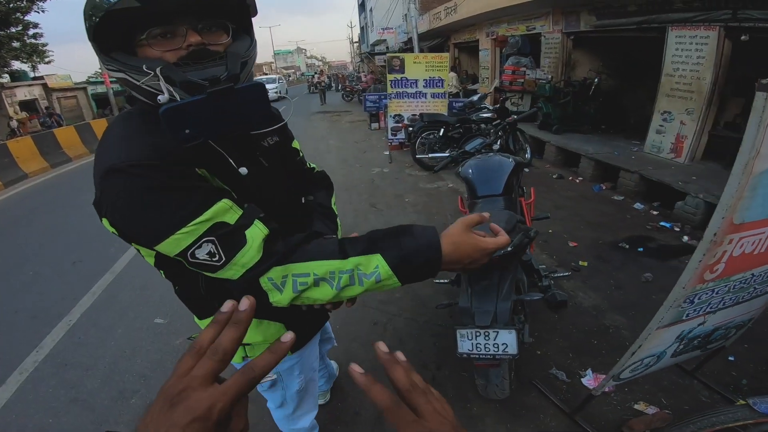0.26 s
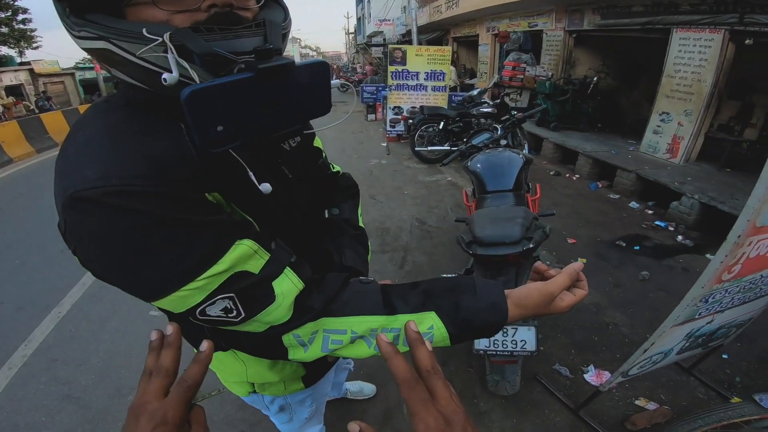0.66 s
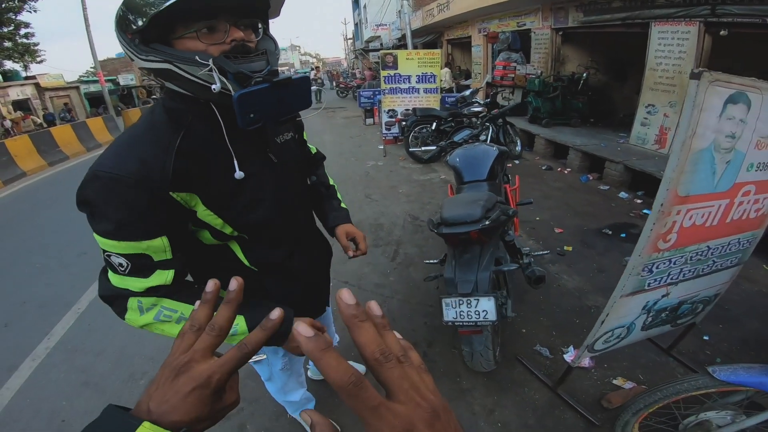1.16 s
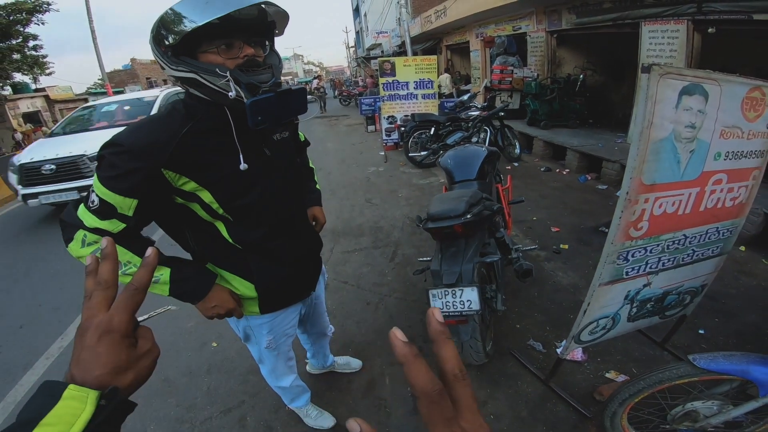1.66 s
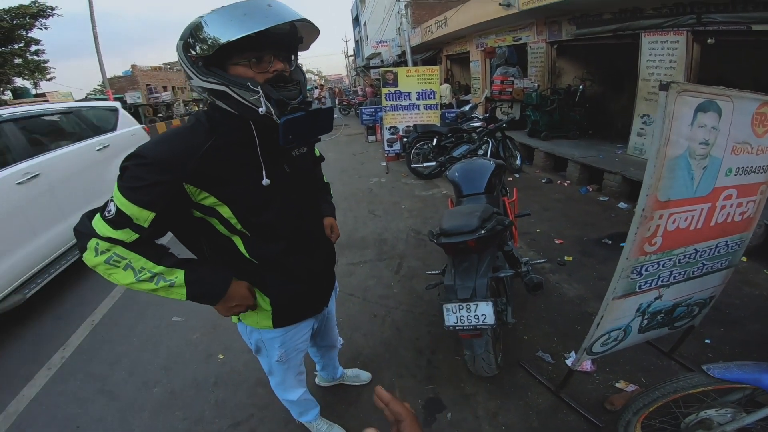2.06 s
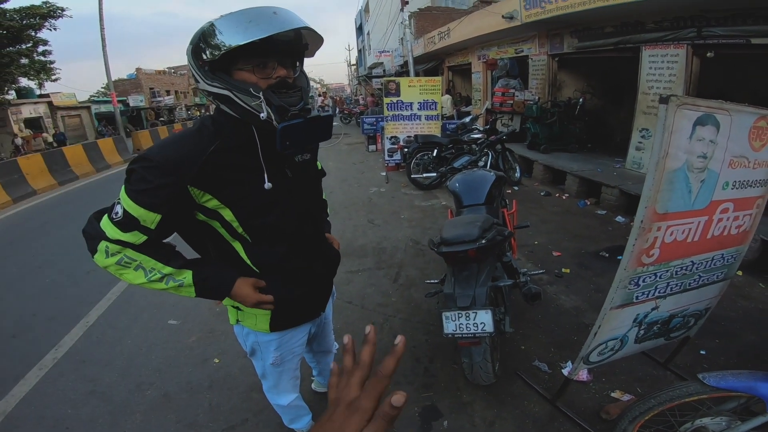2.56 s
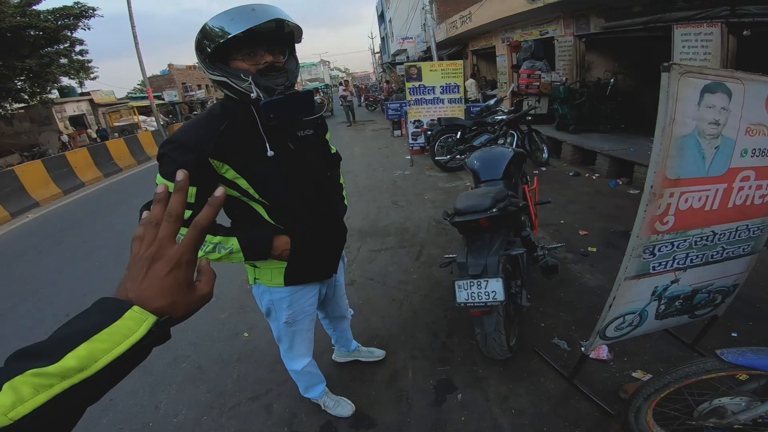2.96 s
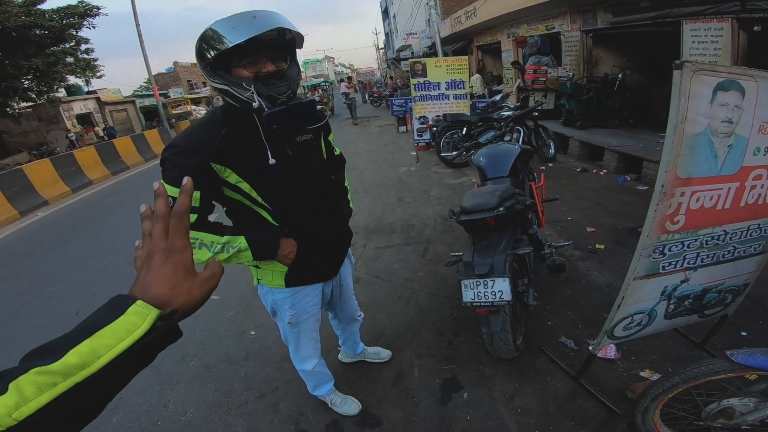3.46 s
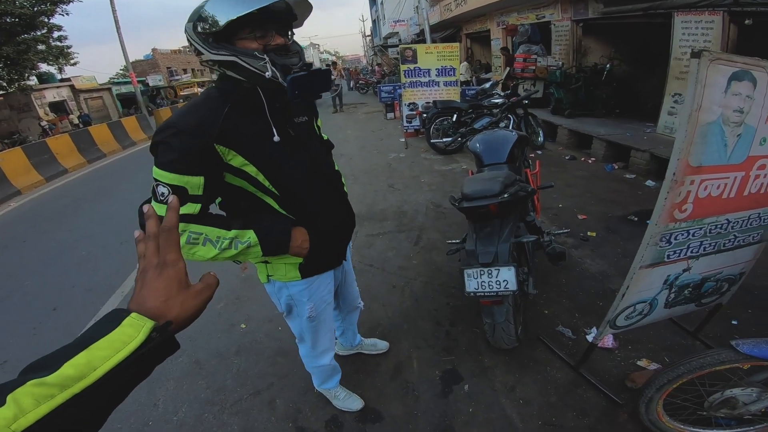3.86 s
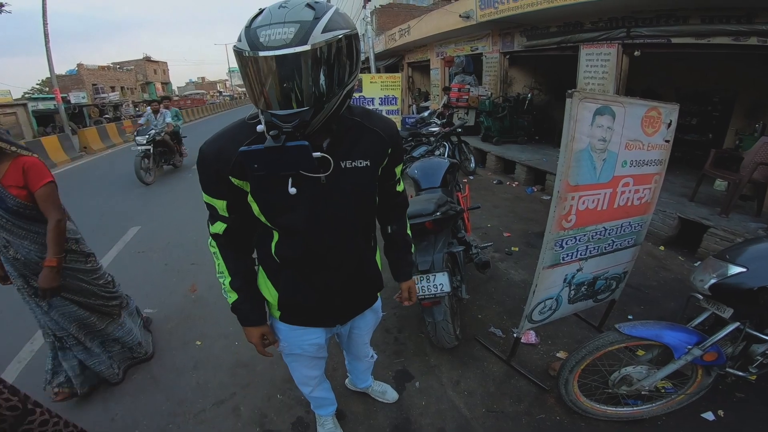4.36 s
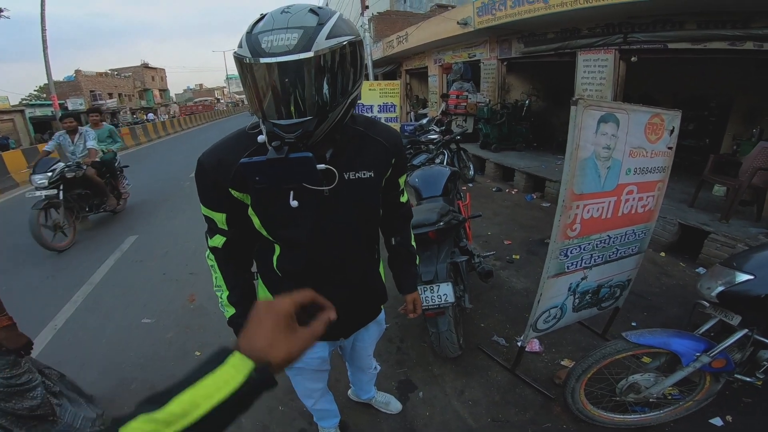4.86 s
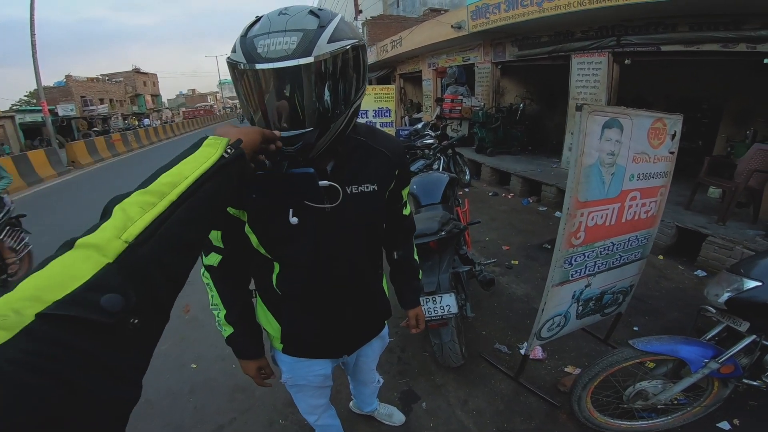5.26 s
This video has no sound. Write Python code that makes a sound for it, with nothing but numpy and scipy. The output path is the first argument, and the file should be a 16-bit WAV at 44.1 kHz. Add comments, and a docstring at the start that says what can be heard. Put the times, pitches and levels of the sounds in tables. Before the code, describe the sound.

Close up and in wide stereo, stiff bristles drag along a motorcycle chain with a rough, metallic scrape. The first stroke is already under way; three firmer ones follow about a second and a half apart, with knocking links and a ringing guard, the last being loudest. Soft brushing and ticking fill the gaps and the ending. Underneath are a steady low machine hum and the faint rumble of a street.

```python
"""A stiff brush is drawn along a greasy motorcycle chain, close to a wide stereo microphone.
We start in the first of four slow strokes: bristles catch and slip, ringing the chain and its guard.
The brush rustles back, links tick, and firmer strokes follow near 1.4 and 2.8 seconds, with snags
and knocking links. The last and hardest comes near 4.4 seconds, then a few more ticks and rustles.
All the while a machine hums nearby and the street rumbles faintly."""
import sys
import numpy as np
from scipy import signal
from scipy.fft import rfft, irfft
from scipy.io import wavfile

SR = 44100
rng = np.random.default_rng(int(sys.argv[2]) if len(sys.argv) > 2 else 0)


def log_audio(samples):
    """Write samples as a 16-bit WAV file to the path given in sys.argv[1]."""
    # one column per channel
    frames = np.atleast_2d(samples).T
    # limit to full scale, then quantise
    limited = np.clip(frames, -1, 1)
    pcm = np.round(limited * 32767).astype(np.int16)
    wavfile.write(sys.argv[1], SR, pcm)


N = 243104

# Brush strokes. Each row: firmest moment, then pressing, holding and easing times, all in seconds;
# scrape, guard ring, fizz and rumble in dB when firmest; fizz in dB at the lift;
# the guard's lower pitch in Hz, and its upper ring in dB against the lower.
BRUSH_STROKES = [(0.144, 1, 0.045, 0.33, -37, -33.5, -49, -36, -67, 1312, -8),
                 (1.39, 0.43, 0.035, 0.4, -31, -28.5, -45, -32.5, -52, 1316, -11),
                 (2.791, 0.45, 0.04, 0.37, -33.5, -32, -45.5, -34.5, -51.5, 1320, -24),
                 (4.351, 0.39, 0.12, 0.53, -27, -24, -38.5, -30, -56.5, 1270, -2)]
# Light brushing. Each row: fullest moment, rise and fall in seconds, scrape in dB, fizz in dB.
LIGHT_RUSTLES = [(.19, 0.14, 0.15, -34.5, -38), (.75, 0.25, 0.078, -47.5, -52),
                 (2.04, 0.079, .09, -70, -62), (2.25, 0.11, 0.22, -62, -63), (3.75, .16, 0.18, -81, -68),
                 (5.19, .03, 0.075, -53.5, -60), (5.33, 0.17, 0.12, -53, -64), (5.51, .07, 0.092, -61, -76)]
# Ways the chain and the frame ring. Each row: pitch in Hz, width in Hz (narrow rings longer), level in dB.
CHAIN_RINGS = [(2240, 430, -5), (2429, 56, 5.5), (2620, 137, 3), (3040, 140, -9), (3410, 43, -7.5),
               (4166, 52, 0), (4960, 164, -3.5), (5120, 38, -2), (6200, 47, -4.5), (6500, 140, -13),
               (6750, 46, 0.5), (7770, 61, -7), (8180, 230, -13.5)]
FRAME_RINGS = [(253.6, 22, 3.5), (387, 18.5, -1.5), (714, 16, -14), (779, 29, 0.5), (934, 54, -3.5)]
# The tone of four noises. Each row: frequency in Hz, relative level in dB.
SCRAPE_TONE = [(800, -1.5), (1100, -19.5), (1700, -4.5), (3000, -11), (5000, -12.5), (6600, -9),
               (9000, -28.5), (10000, -18.5)]
FIZZ_TONE = [(9000, 3.5), (10000, -11), (11000, 3.5), (12300, 10), (14000, -1), (16500, 1)]
FRAME_TONE = [(70, -21), (130, 0), (190, -5.5), (255, -6.5), (350, -5.5), (580, -7.5), (800, -3.5),
              (1000, -8), (1300, -16)]
STREET_TONE = [(30, -27), (60, -11), (130, -2.5), (190, -16), (290, -17), (420, -24), (620, -14),
               (900, -58), (1310, -28.5), (2500, -32.5), (5000, -41.5), (6800, -37), (10000, -76),
               (13000, -55), (16000, -62)]
# Links knocked hard together. Each row: time in seconds, strength of the blow in dB.
HARD_KNOCKS = [(.128, -18), (1.1648, -20.5), (1.2115, -21.5), (1.3635, -9), (1.5797, -19), (2.5547, -15),
               (2.6301, -16), (2.7037, -14), (2.7811, -28), (3.007, -19), (3.0836, -20.5), (4.163, -13),
               (4.2304, -14), (4.2951, -18), (4.4109, -2.5), (4.6066, -12), (4.7276, -14)]
# Bristles that snag. Each row: time in seconds, peak in dB, pitch in Hz, length in seconds.
BRISTLE_SNAGS = [(1.332, -21.5, 1260, 0.016), (1.387, -18.5, 1300, 0.022), (1.409, -19, 1345, 0.022),
                 (1.427, -19.5, 1314, 0.031), (1.484, -28, 1266, 0.018), (2.805, -23.5, 1326, 0.027),
                 (4.2155, -19.5, 1253, 0.016), (4.303, -17, 1184, 0.0086), (4.32, -20, 1484, 0.022),
                 (4.358, -11, 1260, .013), (4.4253, -19.5, 1250, .011), (4.464, -17, 1186, 0.015),
                 (4.548, -19.5, 1225, .009), (4.6179, -14.5, 1280, 0.007), (4.708, -26, 1260, .012),
                 (4.785, -19.5, 1250, 0.01), (4.9028, -28, 1290, .02)]
# Single links ticking. Each row: start in seconds, crack in dB, ring pitch in Hz, ring in dB,
# seconds for the ring to fade by 60 dB, left over right in dB.
LINK_TICKS = [(.5242, -55, 2460, -47, 0.028, 5), (.5404, -46, 960, -58, .04, 0),
              (0.836, -47.5, 1150, -68, 0.035, 2), (.9731, -37, 880, -40, 0.06, 1),
              (1.925, -44, 1310, -58, .04, 4), (2.266, -54, 1320, -69, .04, -10),
              (2.364, -46, 5100, -37, 0.039, 5), (2.414, -47, 1480, -43, 0.03, 14),
              (2.519, -42, 1280, -30, 0.036, 3), (3.309, -62, 1840, -41, 0.033, 13),
              (3.3206, -55, 1690, -35, 0.021, 4), (3.353, -42, 1270, -46.5, 0.14, 3),
              (3.53, -52, 1040, -47, .027, -1), (3.634, -64, 1110, -48, .17, 2),
              (3.942, -52, 865, -47, .04, 8), (3.9645, -44, 6560, -50, .049, -2),
              (5.162, -55, 1120, -48.5, 0.05, -1), (5.186, -44.5, 1480, -48, 0.096, -2),
              (5.204, -54, 1600, -42, .037, 0), (5.238, -58, 2640, -48, .03, -1),
              (5.3037, -48, 2840, -56, .035, 2)]
# The machine's tones. Each row: multiple of its cycle rate, average level in dB.
HUM_TONES = [(2, -56.5), (4, -52.5), (5, -57), (6, -54.5), (7, -59), (8, -42.5), (9, -65), (10, -52),
             (11, -51), (12, -62), (13, -64.5), (14, -62), (15, -73.5), (16, -62), (17, -59), (18, -53),
             (19, -64), (20, -72.5), (21, -61.5), (22, -84), (23, -53), (24, -60), (25, -66), (26, -76),
             (27, -60), (28, -66), (30, -72)]
# Low swells from the road. Each row: middle in seconds, peak in dB, pitch in Hz, length in seconds.
ROAD_SWELLS = [(.17, -42, 55, .2), (1.55, -45, 50, .3), (2.9, -48, 130, .5), (4.45, -44, 125, .3),
               (.85, -41, 122, .4), (2.1, -47, 157, .4)]
# How the microphone's sides compare. Each row: frequency in Hz, likeness from 0 to 1,
# how far the right side leads in radians.
MIC_SIDES = [(60, .95, 0), (130, .65, 0), (345, .55, -.6), (860, .3, -2), (1350, .6, .2), (1900, .3, -1.5),
             (2400, .5, -1.4), (3400, .35, -2.5), (4400, .35, -1), (7000, .4, 0), (8800, .2, -2.5),
             (9800, .7, -3), (10700, .75, -2.5), (12200, .75, -.7), (12700, 1, 0), (16000, 1, 0)]
# Stereo balance. Each row: frequency in Hz, left over right in dB.
BALANCE = [(60, -4), (150, 0), (380, 0.5), (950, 1.5), (2380, 2.5), (5980, 3.5), (15000, -2.5)]
# Dips made by the microphone housing. Each row: frequency in Hz, width in Hz, share removed from 0 to 1.
HOUSING_DIPS = [(5620, 600, .75), (7480, 300, .7), (10000, 900, .35)]

REST_DB = (-66.5, -63.5, -73, -57)   # scrape, ring, fizz, rumble between strokes
TOUCH_DB = (-54, -57.5, -61, -56)   # the same four as the bristles land
LIFT_DB = (-48.5, -49.5, -49.5)   # scrape, ring, rumble as they leave
LAND_S, LIFT_S = 0.029, 0.14
PRESS_CURVE, EASE_CURVE = 1.217, 1.5   # 1 is straight in dB, more gives a rounder top
GUARD_WIDTH_HZ, GUARD_UPPER_HZ, GUARD_UPPER_WIDTH_HZ = 37, 1490, 30
GUARD_WANDER_HZ, GRIP_DB = 8.1, 0.77   # the brush never bears quite evenly
RATTLE_DB, RATTLES_PER_S = 1.5, 48   # the guard's ring flickers as bristles catch
LIGHT_KNOCKS_PER_S, LIGHT_KNOCK_DB = 25, 10   # dB above the scrape
CRACK_FADE_S = 0.042   # time to fade by 60 dB
HUM_CYCLE_HZ, STREET_DB = 12.52, -49.5
ECHO_SHARE, ECHO_SPREAD_S, CUTOFF_HZ = 0.12, 0.002032, 15880
LEFT_RIGHT = np.array([[1], [-1]])   # pushes the two channels opposite ways


def brush_levels():
    """Gains for scrape, ring, fizz and rumble: each stroke lands, presses, holds, eases and lifts."""
    t = np.arange(N) / SR
    power = amp(np.c_[REST_DB].T) ** 2 * np.ones(N)
    grip_db = GRIP_DB * drift(4.0)
    touch_db = np.reshape(TOUCH_DB, (4, 1))
    for firm, press, hold, ease, *levels_db, fizz_lift_db, _, _ in BRUSH_STROKES:
        lift_db = np.reshape([*LIFT_DB[:2], fizz_lift_db, LIFT_DB[2]], (4, 1))
        firm_db = np.reshape(levels_db, (4, 1))
        before = (np.maximum(firm - t, 0) / press) ** PRESS_CURVE
        after = (np.maximum(t - firm - hold, 0) / ease) ** EASE_CURVE
        level_db = firm_db + (touch_db - firm_db) * before + (lift_db - firm_db) * after
        corners_s = [-press - LAND_S, -press, hold + ease, hold + ease + LIFT_S]
        contact = np.interp(t - firm, corners_s, [0, 1, 1, 0]) ** 2
        power += (contact * amp(level_db + grip_db)) ** 2
    for full, rise, fall, scrape_db, fizz_db in LIGHT_RUSTLES:
        swell = np.sin(np.pi / 2 * np.interp(t - full, [-rise, 0, fall], [0, 1, 0])) ** 2
        power[[0, 2]] += (swell * amp([[scrape_db], [fizz_db]])) ** 2
    return np.sqrt(power)


def bristle_slips(per_s, size_db, clump_db):
    """Bristles slip in uneven clumps. Two pairs of signals share the slips, each with random weights."""
    slipping = rng.random(N) < per_s * amp(clump_db * drift(25)) / SR
    sizes = slipping * amp(size_db * np.minimum(rng.exponential(1, N), 5))
    return rms_one(sizes * rng.standard_normal((2, 2, N)) + 1e-9)


def guard(slips, lower_hz, upper_db, pressed):
    """Pressing rings the guard at two pitches; the lower shifts a little with the brush's place."""
    lower, state = np.zeros((2, N)), np.zeros((2, 2))
    decay = np.exp(-np.pi * GUARD_WIDTH_HZ / SR)
    for i in range(0, N, 1024):   # retune for each short block
        block = np.s_[:, i:i + 1024]
        feedback = [1, -2 * decay * np.cos(2 * np.pi * lower_hz[i] / SR), decay * decay]
        lower[block], state = signal.lfilter([1, 0, -1], feedback, slips[0][block], zi=state)
    upper = resonate(slips[1], GUARD_UPPER_HZ, GUARD_UPPER_WIDTH_HZ)
    weak_rings = resonate(resonate(slips[1], 980, 300), 1253, 320)   # many, blurred together
    return pressed * (rms_one(lower) + amp(upper_db) * rms_one(upper)) + amp(-6.5) * rms_one(weak_rings)


def chain(slips, pressed):
    """Pressed bristles make the chain ring above a broad scrape."""
    rings = pressed * ring_body(slips, CHAIN_RINGS, flicker_db=1.0)
    return rms_one(rings + shape_noise(slips, SCRAPE_TONE, flicker_db=3.0))


def frame_rumble(noise):
    """The brushing travels through the frame as a rumble with a few low rings."""
    rumble = shape_noise(noise, FRAME_TONE, flicker_db=3.0)
    return rms_one(rumble + ring_body(noise[::-1], FRAME_RINGS, flicker_db=2.0))


def knocks(scrape):
    """Links knock together, lightly at random and hard at set times; each short burst rings the chain."""
    knocking = rng.random(N) < LIGHT_KNOCKS_PER_S / SR
    blows = knocking * scrape * amp(LIGHT_KNOCK_DB + 3 * rng.standard_normal(N))
    times_s, db = np.transpose(HARD_KNOCKS)
    blows[np.round(times_s * SR).astype(int)] = amp(db)
    fades = signal.lfilter([1], [1, -np.exp(-1 / (.003 * SR))], blows + 1e-9)   # 3 ms tails
    bursts = fades * rng.standard_normal((2, 2, N))
    high_rings = [row for row in CHAIN_RINGS if row[0] > 3300]   # so short a touch skips the low ones
    return amp(1) * ring_body(bursts, high_rings, flicker_db=2.5) + amp(-19.0) * bursts[0]


def snags():
    """A snagged bristle makes the guard's ring swell and let go within hundredths of a second."""
    out = np.zeros((2, N))
    for (time_s, db, hz, length), phase in zip(BRISTLE_SNAGS, rng.uniform(0, 0.99, len(BRISTLE_SNAGS))):
        t = np.arange(round(length * SR)) / SR
        i = round((time_s - .002) * SR)
        wave = np.sin(2 * np.pi * hz * t + phase * LEFT_RIGHT)
        out[:, i:i + len(t)] += amp(db) * np.sin(np.pi * t / length) ** 2 * wave
    return out


def ticks():
    """A link ticks with a dying crack of noise and a short, rough ring."""
    out, t = np.zeros((2, N + SR)), np.arange(SR // 5) / SR
    high_pass = signal.butter(2, 900, "high", fs=SR, output="sos")
    for start_s, crack_db, hz, ring_db, fade_s, pan_db in LINK_TICKS:
        noise = rng.standard_normal((2, len(t)))
        hiss = signal.sosfilt(high_pass, signal.lfilter([.7], [1, -.3], noise))
        crack = amp(crack_db - 60 * t / CRACK_FADE_S) * hiss
        tone = 0.75 * np.sin(2 * np.pi * hz * t) + 0.74 * rms_one(resonate(noise, hz, hz / 5))
        ring = amp(ring_db - 60 * t / fade_s) * tone
        i = round(start_s * SR)
        out[:, i:i + len(t)] += amp(pan_db / 2 * LEFT_RIGHT) * (crack + ring)
    return out[:, :N]


def machine_hum():
    """A turning machine hums at multiples of its cycle rate; its speed and each tone's level waver."""
    cycles = np.cumsum(HUM_CYCLE_HZ * (1 + .001 * drift(.4))) / SR
    out = np.zeros((2, N))
    for (multiple, db), (phase, apart) in zip(HUM_TONES, rng.random((len(HUM_TONES), 2))):
        offset = 0.016 * multiple * (apart - .5) * LEFT_RIGHT   # high tones reach the sides out of step
        tone = np.sqrt(2) * np.sin(2 * np.pi * (multiple * cycles + phase + offset))
        out += balance(multiple * HUM_CYCLE_HZ) * amp(db + 2.2 * drift(1.67)) * tone
    return out


def street(noise):
    """Faint street noise, with low swells from the road that rise and fade."""
    t = np.arange(N) / SR
    steady = amp(STREET_DB) * rms_one(shape_noise(noise[::-1, :, ::-1], STREET_TONE, flicker_db=2.5))
    swells = sum(amp(db) * np.exp(-(2 * (t - middle) / length) ** 2)
                 * rms_one(resonate(noise[0], hz, hz / 12)) for middle, db, hz, length in ROAD_SWELLS)
    return steady + swells


def stereo(pair):
    """The right side hears the left's sound shifted in phase, its close echoes, and a sound of its own."""
    hz = np.maximum(np.fft.rfftfreq(N, 1 / SR), 1)
    left, own = rfft(pair)
    sides = np.array(MIC_SIDES)
    alike, lead = at_hz(sides[:, :2], hz), at_hz(sides[:, ::2], hz)
    delay_s = ECHO_SPREAD_S * drift(3.02)[:len(hz)]   # wanders from one frequency to the next
    echo = left * np.exp(2j * np.pi * np.cumsum(delay_s) * SR / N)
    unlike = np.sqrt(ECHO_SHARE) * echo + np.sqrt(1 - ECHO_SHARE) * own
    right = alike * left * np.exp(1j * lead) + np.sqrt(1 - alike ** 2) * unlike
    return irfft(balance(hz) * [left, right], N)


def balance(hz):
    """Left and right gains at a frequency."""
    return amp(at_hz(BALANCE, hz) / 2 * LEFT_RIGHT)


def ring_body(sources, rings, flicker_db):
    """A body rings at several pitches at once, each caught now harder, now softer."""
    return sum(resonate(amp(db + flicker_db * drift(29.0)) * sources[k % 2], hz, width)
               for k, (hz, width, db) in enumerate(rings))


def shape_noise(sources, tone, flicker_db):
    """Build a noise from bands a third of an octave wide, each with its own level and flicker."""
    out, edges = 0, 30 * 2 ** (np.arange(29) / 3)
    for k, (low, high) in enumerate(zip(edges, edges[1:])):
        hz = np.sqrt(low * high)
        if tone[0][0] * .8 < hz < tone[-1][0] * 1.2:
            band_pass = signal.butter(2, [low, high], "band", fs=SR, output="sos")
            band = signal.sosfilt(band_pass, sources[k % 2])
            out = out + amp(at_hz(tone, hz) + flicker_db * drift(15)) * band
    return out


def resonate(x, hz, width_hz):
    """Ring at one pitch: that pitch passes at full strength, the rest is weakened."""
    decay = np.exp(-np.pi * width_hz / SR)
    feedback = [1, -2 * decay * np.cos(2 * np.pi * hz / SR), decay * decay]
    return signal.lfilter((1 - decay * decay) / 2 * np.array([1, 0, -1]), feedback, x)


def drift(rate_hz):
    """A smooth random wobble of typical size 1, worked out every 40 samples."""
    decay = np.exp(-80 * np.pi * rate_hz / SR)
    noise = rng.standard_normal(N // 40 + 2002)
    slow = signal.lfilter([1], [1, -2 * decay, decay * decay], noise)[2000:]   # let the filter settle
    return np.interp(np.arange(N) / 40, np.arange(len(slow)), rms_one(slow))


def in_time(rows):
    """Join timed rows with straight lines, giving one curve for each column of values."""
    times_s, *columns = np.transpose(rows)
    return [np.interp(np.arange(N) / SR, times_s, column) for column in columns]


def at_hz(points, hz):
    """Read between a table's rows, with octaves evenly spaced."""
    frequencies, values = np.transpose(points)
    return np.interp(np.log(hz), np.log(frequencies), values)


def amp(db):
    """Turn dB into a gain to multiply by."""
    return 10 ** (np.asarray(db) / 20)


def rms_one(x):
    """Scale a signal so its average level (rms) is 1."""
    return x / np.sqrt(np.mean(x ** 2) + 1e-20)


def scene():
    """Add up the brush on the chain, the ticking links, the machine and the street."""
    scrape, ring, fizz, rumble = brush_levels()
    lower_hz, upper_db = in_time([(row[0], *row[-2:]) for row in BRUSH_STROKES])
    lower_hz += GUARD_WANDER_HZ * drift(2.5)
    pressed = np.clip((scrape / amp(-38.5)) ** 0.49, amp(-18), 1)   # a light touch hardly rings metal
    slips = bristle_slips(per_s=9000, size_db=2.0, clump_db=1.5)
    rattle = amp(RATTLE_DB * drift(RATTLES_PER_S))
    brush = ring * rattle * guard(slips, lower_hz, upper_db, pressed)
    brush += scrape * chain(slips, pressed)
    brush += fizz * rms_one(shape_noise(slips, FIZZ_TONE, flicker_db=0.6))
    brush += knocks(scrape)
    noise = rng.standard_normal((2, 2, N))
    brush += rumble * frame_rumble(noise)
    return stereo(brush + street(noise)) + snags() + ticks() + machine_hum()


def record(dry):
    """The microphone's housing makes dips in the treble, and the very top is cut off."""
    for hz, width, share in HOUSING_DIPS:
        dry = dry - share * resonate(dry, hz, width)
    return signal.sosfilt(signal.cheby2(24, 60, CUTOFF_HZ, fs=SR, output="sos"), dry)


dry = scene()
out = record(dry)
log_audio(out)
```